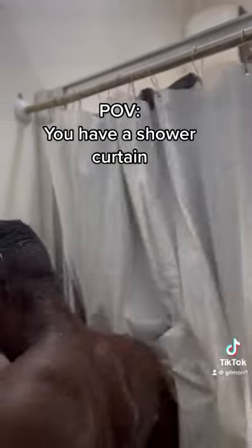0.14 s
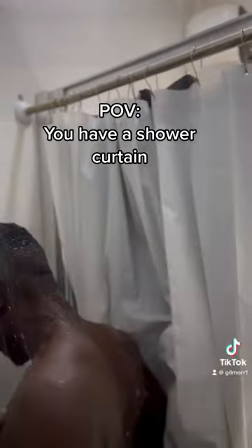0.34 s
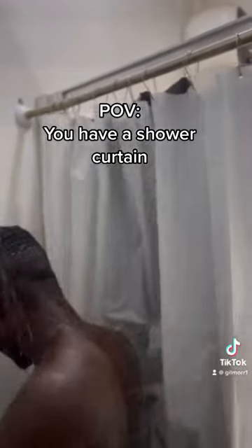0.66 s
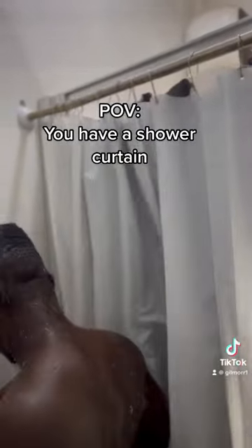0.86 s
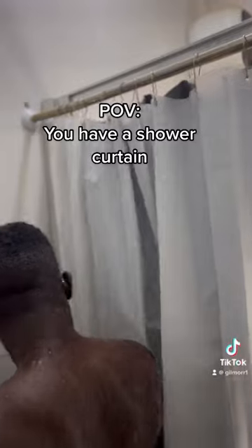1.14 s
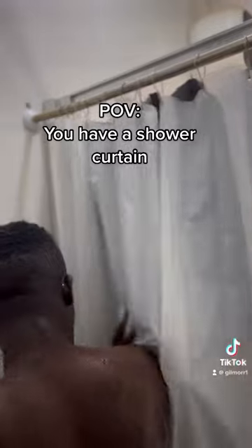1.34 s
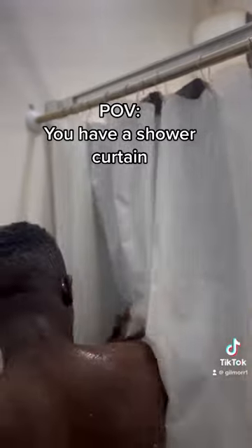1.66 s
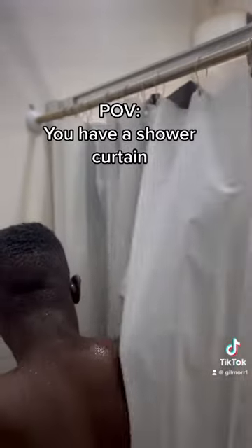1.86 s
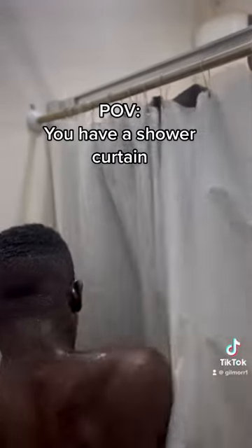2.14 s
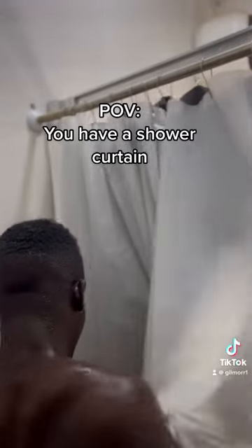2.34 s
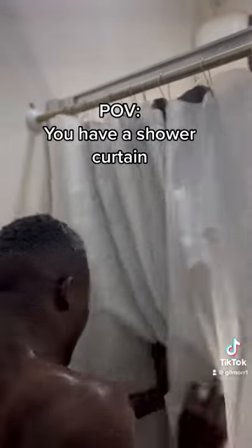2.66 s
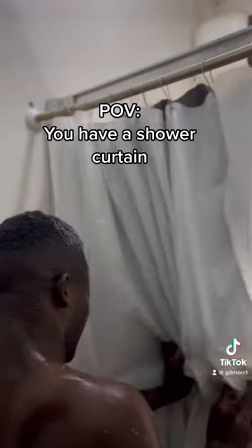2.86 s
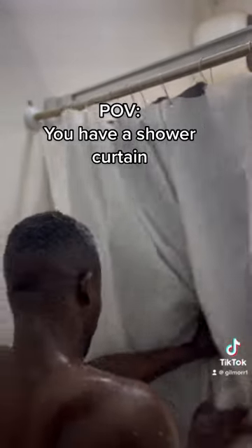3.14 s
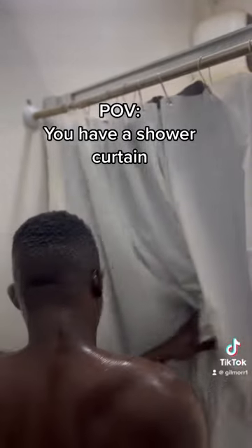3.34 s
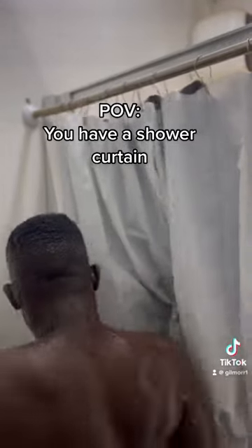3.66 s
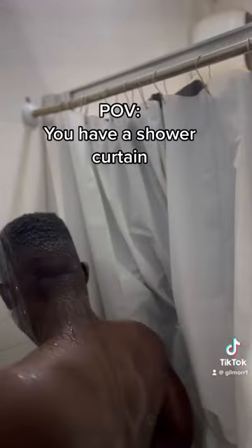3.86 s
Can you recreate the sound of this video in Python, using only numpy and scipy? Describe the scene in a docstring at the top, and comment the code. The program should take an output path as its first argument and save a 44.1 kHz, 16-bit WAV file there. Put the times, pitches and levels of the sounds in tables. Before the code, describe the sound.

Shower water runs for four seconds in a small tiled bathroom, a bright, uneven hiss of dense droplets with sharp wet splats. The first second has mostly spray and light curtain rustle. From 1.2 s a plastic curtain slaps, crinkles and booms low, strongest around 1.65, 2.1-2.5 and 2.8 s. A faint drop plinks at 3.3 s; after 3.7 s, spray and splats dominate. Close stereo, short reflections.

```python
"""A shower runs for four seconds in a small tiled bathroom, heard at two microphone ports.
From the start spray fizzes and hisses as dense random impacts, and gobs of water splat as bursts of banded noise.
From about 1.2 s a plastic curtain, pushed about in the spray, booms and crinkles more strongly: its slaps
are noise bursts, its crinkle is filtered impacts, and its boom is noise driving the air modes of the room.
At 3.3 s one drop plinks as a decaying, rising sine; throughout, the tiles answer as decaying noise."""
import sys
import numpy as np
from scipy import signal
from scipy.fft import rfft, irfft, next_fast_len
from scipy.io import wavfile
from scipy.ndimage import uniform_filter1d, map_coordinates

SR = 44100
rng = np.random.default_rng(int(sys.argv[2]) if len(sys.argv) > 2 else 0)


def to_wav(s):
    """Save 16-bit WAV."""
    ch = np.atleast_2d(s).T  # columns
    pcm = np.round(np.clip(ch, -1, 1) * 32767)  # PCM
    wavfile.write(sys.argv[1], SR, pcm.astype(np.int16))


def undo_db(level):
    """Turn decibels back into plain size, where 20 dB means ten times bigger."""
    steps = np.asarray(level, float) / 20
    return 10 ** steps


N = 176400

# spray over time: start_s, spray_db, hiss_re_spray_db
SPRAY_LEVELS = [(0.0, -54, -1.5), (0.74, -53.5, 5.5), (0.87, -62.5, 9.5), (1.06, -58.5, 0),
                (1.21, -51.5, 6), (1.36, -50, 7), (2.28, -52, 7.5), (2.46, -62, 3), (3.24, -48.5, 5),
                (3.65, -53, -1.5), (3.69, -51, 4.5), (4.0, -53, 1.5)]
# gobs of water landing: start_s, peak_db (nominal), centre_hz, t60_s, crack_re_rush_db
SPLATS = [(0.181, -31.5, 6660, 0.25, 4), (0.255, -29.5, 4930, 0.071, 4), (0.3772, -32.5, 3360, 0.63, 18),
          (0.6394, -29.5, 5950, 0.3, 12), (0.743, -28, 6960, 0.16, 8), (0.822, -25.5, 4400, 0.16, 11),
          (1.493, -23, 4460, 0.28, 3), (1.836, -27, 6100, 0.098, 5), (2.079, -30, 3300, 0.13, 12),
          (2.105, -24, 4650, 0.14, 11.5), (2.173, -27, 4600, 0.17, 15), (2.362, -24.5, 4960, 0.31, 7),
          (2.422, -24, 4400, 0.08, 11), (2.604, -29.5, 4330, 0.4, -11), (2.76, -26.5, 2670, 0.1, 2),
          (3.06, -30.5, 4670, 0.2, 0), (3.333, -27, 4700, 0.12, 8), (3.687, -25, 6160, 0.25, 5),
          (3.7365, -27, 4850, 0.11, 11), (3.8895, -21, 4300, 0.055, 0), (3.927, -27.5, 5300, 0.073, 10)]
# curtain and tub over time: start_s, push_db (drive of the air modes), crinkle_re_push_db
CURTAIN_LEVELS = [(0.0, -39, -7), (0.14, -44, -27), (0.35, -45.5, -7), (0.44, -43.5, -5), (1.16, -44, -19),
                  (1.19, -31, -2.5), (1.45, -33, -10), (1.47, -38, -3.5), (1.61, -38.5, -8),
                  (1.65, -24.5, -7.5), (1.76, -27.5, -9.5), (1.84, -36.5, -19), (1.9, -31, -3),
                  (2.06, -39, -5), (2.09, -26, -6.5), (2.17, -32.5, -1.5), (2.25, -27, -8.5),
                  (2.345, -38, -6), (2.365, -25.5, -8.5), (2.43, -26, -8.5), (2.54, -39, -4.5),
                  (2.72, -36.5, -1), (2.77, -29, -2), (2.83, -31.5, -0.5), (2.9, -37.5, -9.5),
                  (3.09, -35, 0), (3.73, -46.5, -12.5), (4.0, -41.5, 0)]
# slaps of the sheet: start_s, peak_db (nominal), centre_hz
SLAPS = [(0.086, -34.5, 480), (0.378, -32.5, 620), (1.182, -20.5, 880), (1.322, -27, 704),
         (1.411, -24.5, 330), (1.645, -25, 330), (1.735, -31, 700), (2.222, -21.5, 730), (2.36, -23.5, 320),
         (2.377, -17.5, 970), (2.763, -18.5, 392), (3.021, -30, 600), (3.2, -26, 680)]
# air modes of the small room: centre_hz, width_hz, gain_db
AIR_MODES = [(60.7, 10.3, 8), (109, 40, 2), (144.7, 7, 8), (177.3, 21.3, 2), (223.4, 50.7, -1),
             (280.2, 23.4, -3.5), (338.3, 12.3, -6), (480, 13.6, -21)]
# spectrum of the fine spray: frequency_hz, relative_db
FIZZ_SPECTRUM = [(4500, -17), (6000, -5), (10000, -10), (14500, -11), (16000, -32)]
# spectrum of the lower hiss of the spray: frequency_hz, relative_db
HISS_SPECTRUM = [(700, -86), (1500, -6.5), (2700, 1), (5000, 0), (7000, -14)]
# spectrum of the crinkling sheet: frequency_hz, relative_db
CRINKLE_SPECTRUM = [(250, -9.5), (450, -8), (850, 3), (1200, -6.5), (1800, -5), (2800, -1.5), (5000, -6.5),
                    (9000, -14), (16000, -21)]
# decay of the walls' answer: frequency_hz, t60_s
TILE_DECAY = [(100, 0.13), (3000, 0.084), (14000, 0.14)]
# likeness of the sound field at the two ports: frequency_hz, likeness (0 to 1)
PORT_LIKENESS = [(60, 1), (300, 1), (700, 0.49), (2500, 0.52), (4400, 0), (5500, 0.75), (15000, 1)]
# phase by which the left port leads: frequency_hz, lead_rad
PORT_LEAD = [(0, 0), (500, -.55), (1100, -.8), (1800, .3), (3050, 2.9), (3500, 1.7), (4400, .6),
             (6000, 3.14), (17000, 19.2)]
# level of the left port minus the right: frequency_hz, difference_db
PORT_DIFFERENCE = [(60, -1.5), (400, -0.4), (620, -5.5), (950, -0.5), (1350, -3), (2400, .4), (4600, -1.5),
                   (5700, -0.5)]


def unit(x):
    """Normalization: scale to rms 1."""
    return x / np.sqrt(np.mean(x ** 2) + 1e-20)


def along(points, hz):
    """Interpolation of (frequency_hz, value) points on a logarithmic frequency axis."""
    f, v = np.transpose(points)
    return np.interp(np.log(hz + 1), np.log(f + 1), v)


def curves(rows):
    """Linear interpolation in time: one value per sample for each column after the time."""
    start_s, *columns = np.transpose(rows)
    return [np.interp(np.arange(N) / SR, start_s, column) for column in columns]


def wobble(knots_per_s):
    """Random modulation: a smooth curve through random knots."""
    knots = rng.standard_normal(int(N * knots_per_s / SR) + 4)
    return map_coordinates(knots, [np.arange(N) * knots_per_s / SR])


def filtered(x, response):
    """Linear filtering: the spectrum times a complex response of frequency."""
    m = next_fast_len(x.shape[-1] + 8192)
    spectrum = rfft(x, m) * response(np.fft.rfftfreq(m, 1 / SR))
    return irfft(spectrum, m)[..., :x.shape[-1]]


def coloured(x, points):
    """Spectral shaping: filter by a (frequency_hz, relative_db) table, then scale to rms 1."""
    return unit(filtered(x, lambda hz: undo_db(along(points, hz))))


def patter(count, spread_db, share, patchy_db):
    """Shot noise: uneven impacts on steady noise, with random patches of gain over time and frequency."""
    place, chance, sign = rng.random((count, 3)).T
    size = undo_db(-spread_db * np.log(chance + 1 / 200)) * np.sign(sign - .5)
    impacts = unit(np.bincount((place * N).astype(int), size, N))
    # share is the part of the power in impacts
    x = np.sqrt(share) * impacts + np.sqrt(1 - share) * rng.standard_normal(N)
    z = signal.stft(x, nperseg=512)[2]
    field = uniform_filter1d(rng.standard_normal(z.shape), size=12, axis=0)
    field = uniform_filter1d(field, size=5, axis=1)
    return signal.istft(z * undo_db(patchy_db * unit(field)), nperseg=512)[1][:N]


def bursts(rows, octaves):
    """Impact radiation: a sharp crack and a rush of noise, each in a Gaussian band about the centre."""
    rise_s, fade_power, crack_t60_s = 0.00057, 1.257, 0.007
    out, t = np.zeros(N + SR), np.arange(SR // 3) / SR
    spread = octaves * np.array([[1], [1.15]])  # the crack is a little wider than the rush
    crack_fade = undo_db(-60 * t / crack_t60_s)
    for start_s, peak_db, centre_hz, t60_s, crack_db in rows:
        noise = rng.standard_normal((2, len(t)))
        bands = filtered(noise, lambda hz: np.exp(-.5 * (np.log2((hz + 1) / centre_hz) / spread) ** 2))
        rush, crack = unit(bands[0]), unit(bands[1]) * crack_fade
        rush = rush * (1 - np.exp(-t / rise_s)) * undo_db(-60 * (t / t60_s) ** fade_power)
        crack = crack * np.linalg.norm(crack_fade) / np.linalg.norm(crack)
        # noise of rms 1 is set 8 dB below the nominal peak
        out[round(start_s * SR):][:len(t)] += undo_db(peak_db - 8) * (rush + crack * undo_db(crack_db))
    return out[:N]


def spray():
    """Superposition: thousands of drops a second burst on skin and plastic; heavier gobs splat singly."""
    spray_db, hiss_db = curves(SPRAY_LEVELS)
    spray_db = spray_db + 2.8 * wobble(knots_per_s=46)
    fizz = coloured(patter(count=16000, spread_db=5.0, share=0.32, patchy_db=3.0), FIZZ_SPECTRUM)
    hiss = coloured(patter(count=9000, spread_db=3, share=.4, patchy_db=1.2), HISS_SPECTRUM)
    splats = bursts(SPLATS, octaves=0.53)
    return undo_db(spray_db + 6.5) * fizz + undo_db(spray_db + hiss_db) * hiss + splats


def curtain():
    """Impulsive excitation of a sheet: it crinkles in the spray, and its slaps are short thumps and claps."""
    push_db, crinkle_db = curves(CURTAIN_LEVELS)
    crinkle = coloured(patter(count=5000, spread_db=3.5, share=0.68, patchy_db=2.0), CRINKLE_SPECTRUM)
    crinkle_db = push_db + crinkle_db + 1.82 * wobble(knots_per_s=29.535)
    slap_t60_s, slap_crack_db = 0.096, 6
    slap_rows = [(start_s, peak_db, hz, slap_t60_s, slap_crack_db) for start_s, peak_db, hz in SLAPS]
    return undo_db(crinkle_db) * crinkle + bursts(slap_rows, octaves=0.79)


def boom():
    """Modal resonance: the big sheet and the drumming tub pump the air modes of the room."""
    def air(f):
        return sum(undo_db(gain_db) * 1j * f * width / (centre * centre - f * f + 1j * f * width)
                   for centre, width, gain_db in AIR_MODES)
    push = undo_db(curves(CURTAIN_LEVELS)[0]) * patter(count=3000, spread_db=1.5, share=0.21, patchy_db=1.5)
    return undo_db(16.5) * filtered(push, air)


def drip():
    """Damped oscillation of rising pitch: one drop plinks into standing water."""
    start_s, level_db, pitch_hz, t60_s = 3.302, -29, 2000, .03
    t = np.clip(np.arange(N) / SR - start_s, 0, None)
    return undo_db(level_db - 60 * t / t60_s) * np.sin(2 * np.pi * pitch_hz * t * (1 + 3 * t))


def tiles(x):
    """Reverberation: the walls answer as decaying noise, redrawn each 0.1 s so no one tail colours the whole."""
    out, hop = np.zeros(N + SR), SR // 10
    padded = np.pad(x, (hop, 2 * hop))
    for at in range(-hop, N, hop):
        hz, t, z = signal.stft(rng.standard_normal(SR // 3), SR, nperseg=256)
        decay = undo_db(-60 * t / along(TILE_DECAY, hz)[:, None])
        tail = signal.istft(z * decay, SR, nperseg=256)[1]
        piece = padded[at + hop:][:2 * hop] * np.hanning(2 * hop)  # overlapping windows
        piece = piece[max(-at, 0):]
        wet = signal.fftconvolve(piece, tail / np.linalg.norm(tail))
        out[max(at, 0):][:len(wet)] += wet
    return out[:N]


def scene():
    """Partial coherence: sound common to both ports, and scattered sound that differs between them."""
    water, low = spray() + curtain() + drip(), boom()
    common = water + low + undo_db(-9.5) * tiles(water)
    scattered = tiles(water + low)

    def angle(hz):
        return np.arccos(np.clip(along(PORT_LIKENESS, hz), -1, 1)) / 2
    mid = filtered(common, lambda hz: np.cos(angle(hz)))
    side = filtered(scattered, lambda hz: np.sin(angle(hz)))
    return np.array([mid + side, mid - side])


def roll_off(x):
    """The treble ends steeply here."""
    return signal.sosfilt(signal.butter(12, 15910, fs=SR, output="sos"), x)


def record(dry):
    """Interchannel difference: the ports differ in phase and colour.

    A separate joint-stereo step then lowers the sum or the difference where it is weak above 5 kHz."""
    low_cut_hz, top_hz = 41, 15850
    gap_from_hz, gap_scale_hz, gap_db = 5000, 27200, -11
    half = np.array([[.5], [-.5]])  # each port takes half of the difference

    def lead(hz):
        return np.interp(hz, *np.transpose(PORT_LEAD))

    def port(hz):
        colour = undo_db(half * along(PORT_DIFFERENCE, hz)) * np.exp(1j * half * lead(hz))
        return colour * (hz < top_hz) / (1 + (low_cut_hz / (hz + 1)) ** 4)

    def joint_stereo_gaps(hz):
        strength = np.abs([np.cos(lead(hz) / 2), np.sin(lead(hz) / 2)])  # of sum and difference
        weak = strength < hz / gap_scale_hz * (hz > gap_from_hz)
        return undo_db(gap_db * weak)
    left, right = filtered(dry, port)
    mid, side = filtered(np.array([left + right, left - right]) / 2, joint_stereo_gaps)
    return roll_off(np.array([mid + side, mid - side]))


dry = scene()
out = record(dry)
to_wav(out)
```